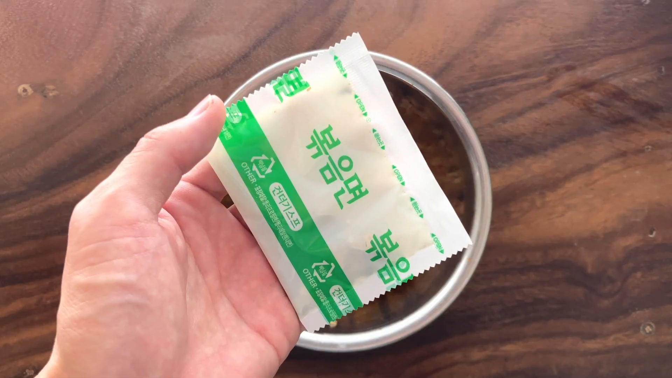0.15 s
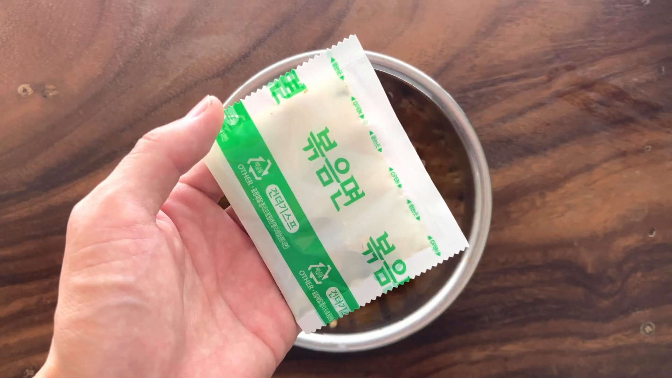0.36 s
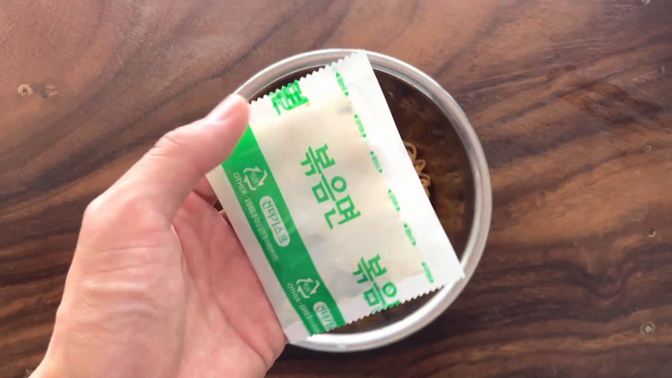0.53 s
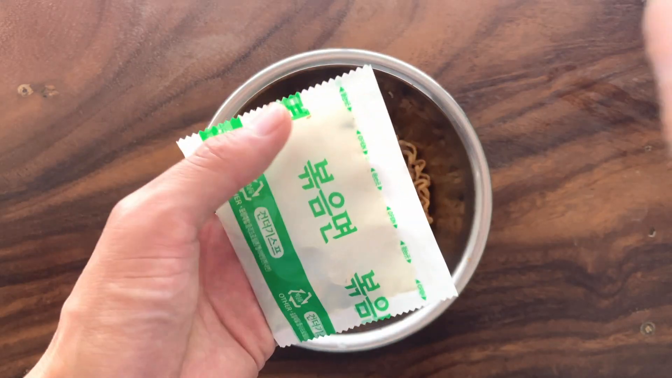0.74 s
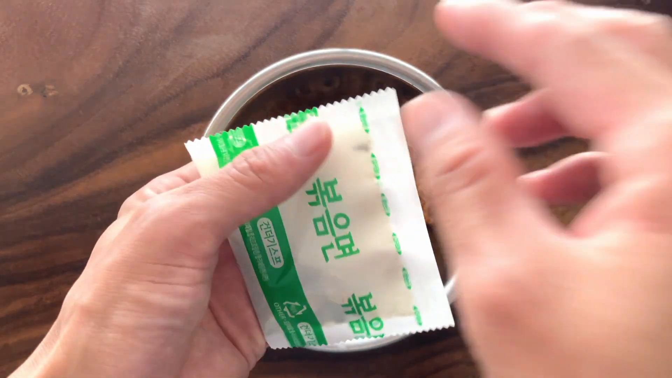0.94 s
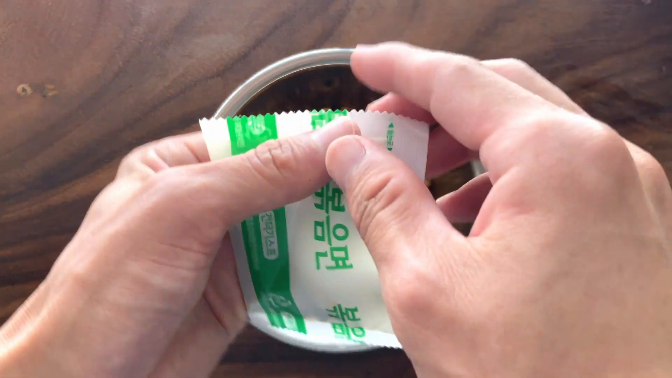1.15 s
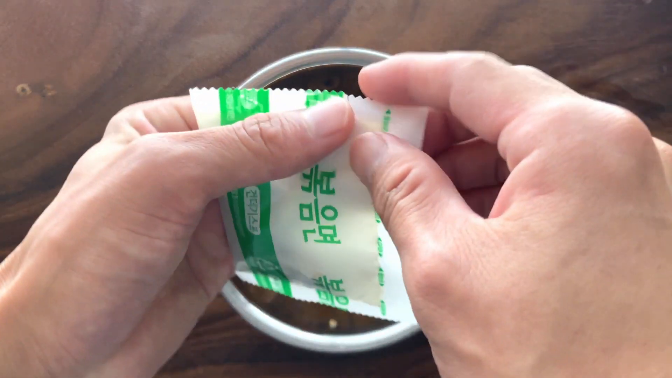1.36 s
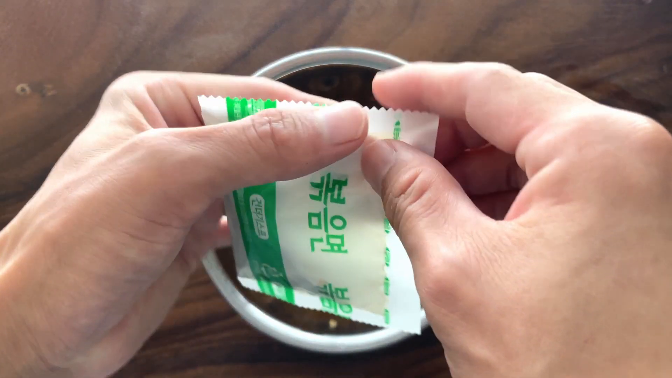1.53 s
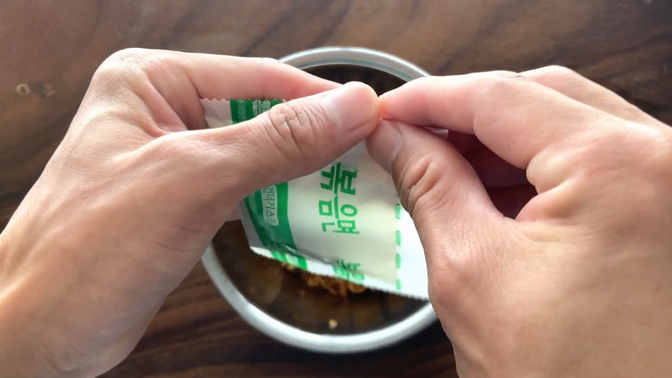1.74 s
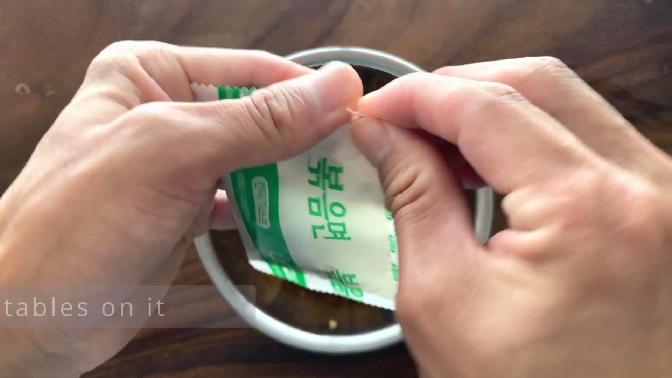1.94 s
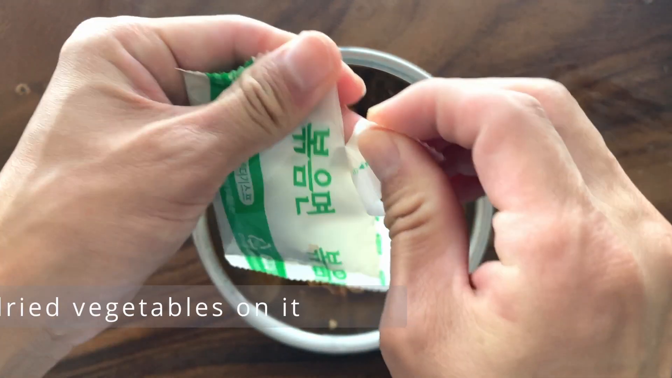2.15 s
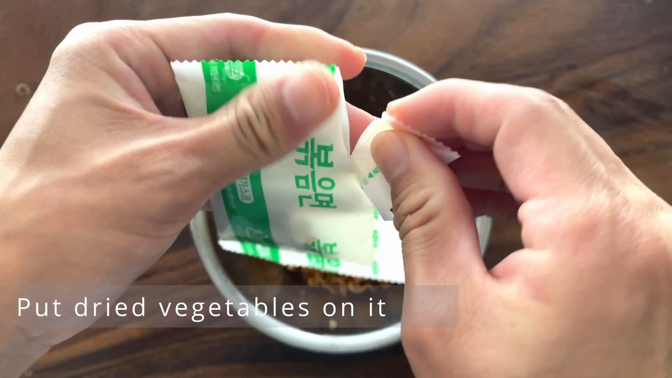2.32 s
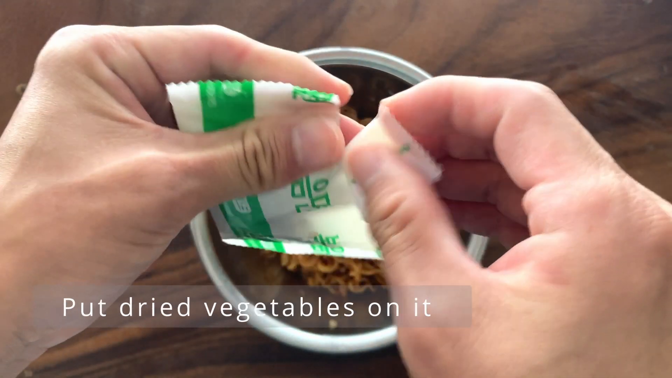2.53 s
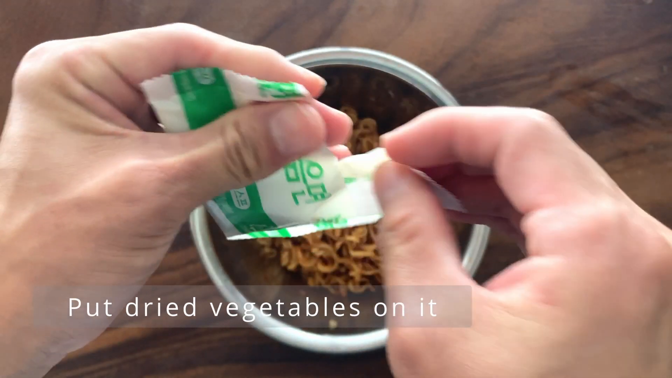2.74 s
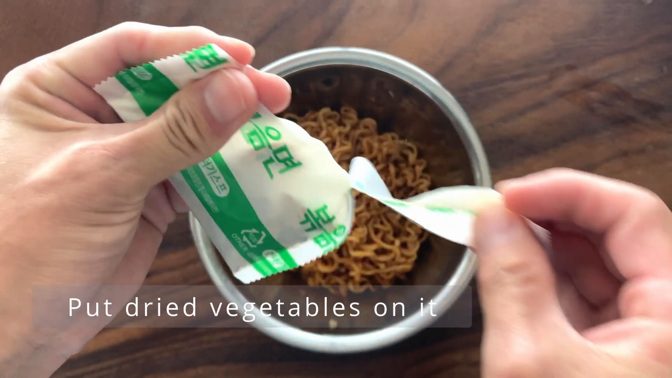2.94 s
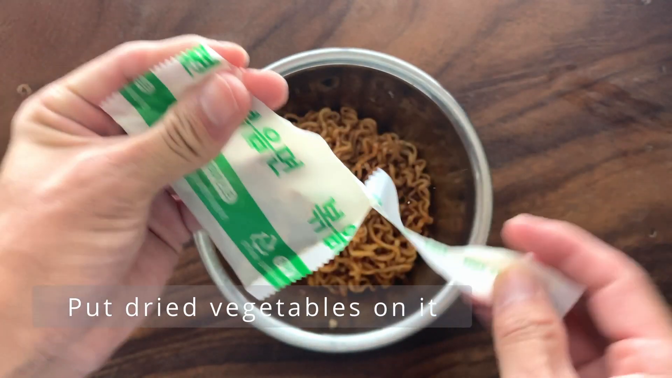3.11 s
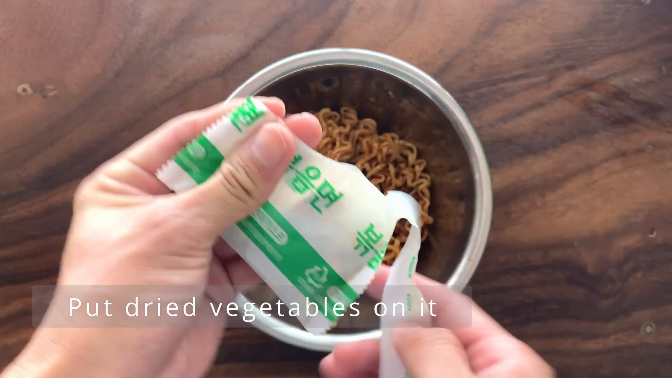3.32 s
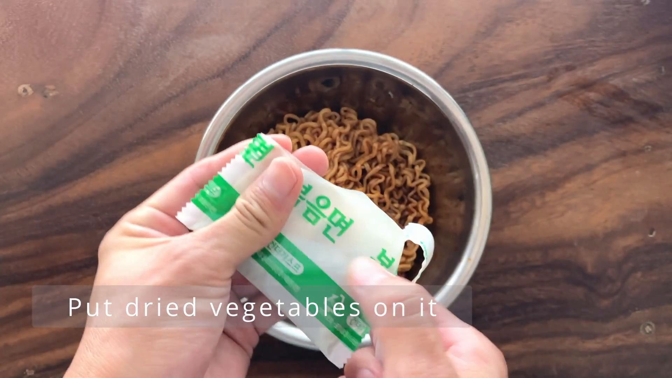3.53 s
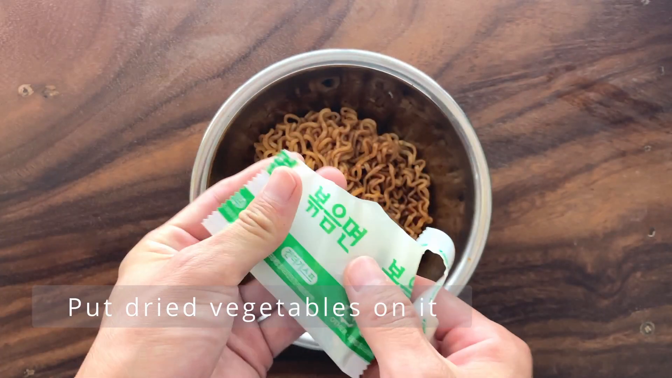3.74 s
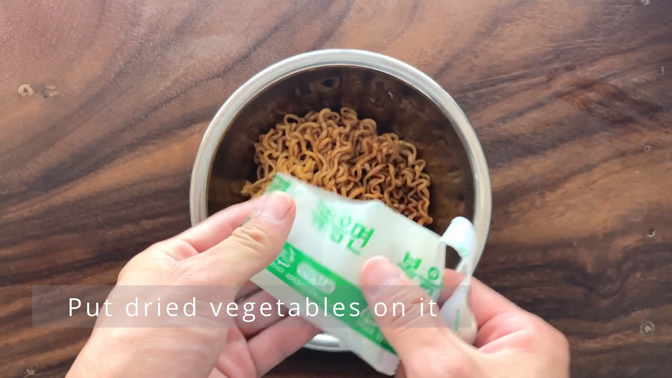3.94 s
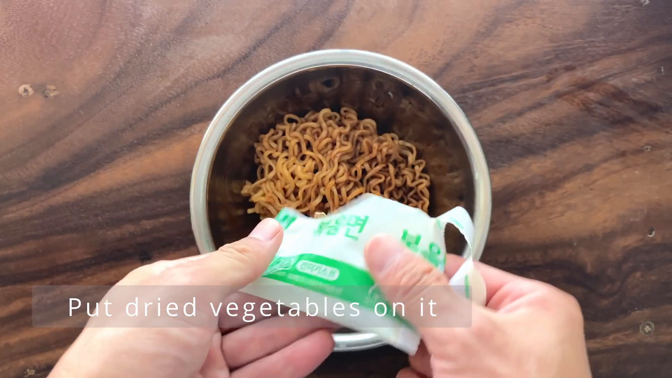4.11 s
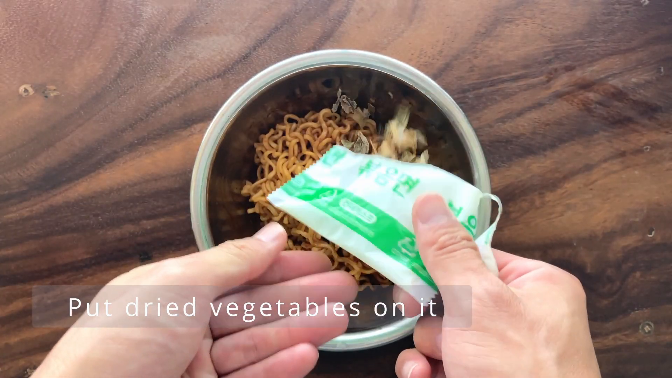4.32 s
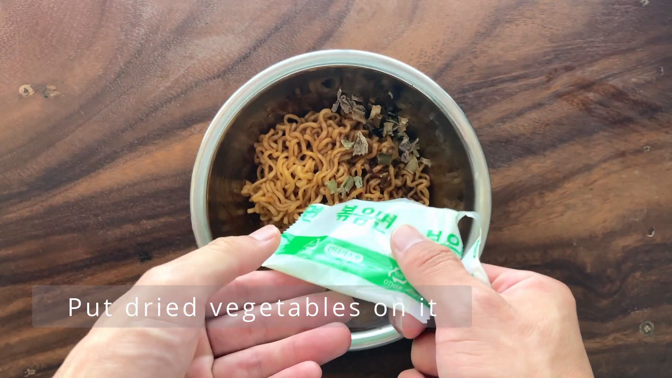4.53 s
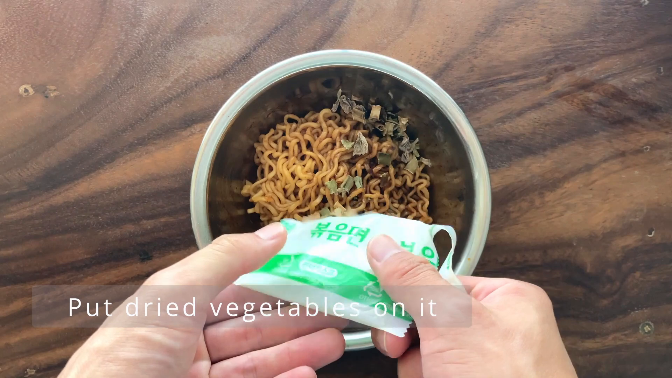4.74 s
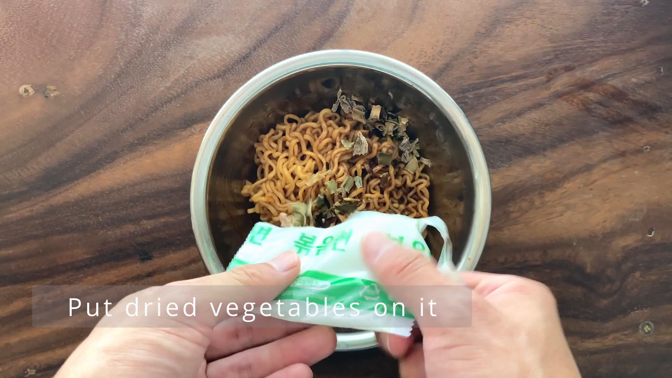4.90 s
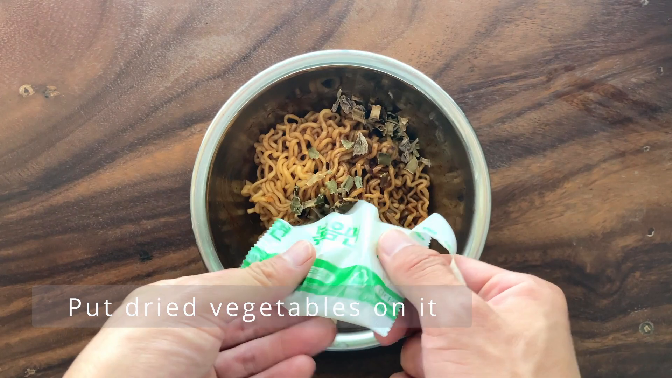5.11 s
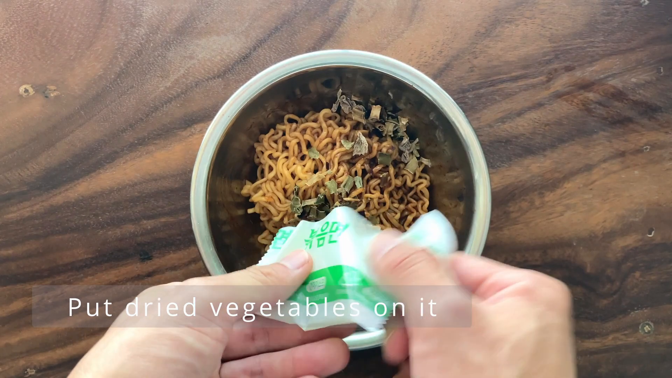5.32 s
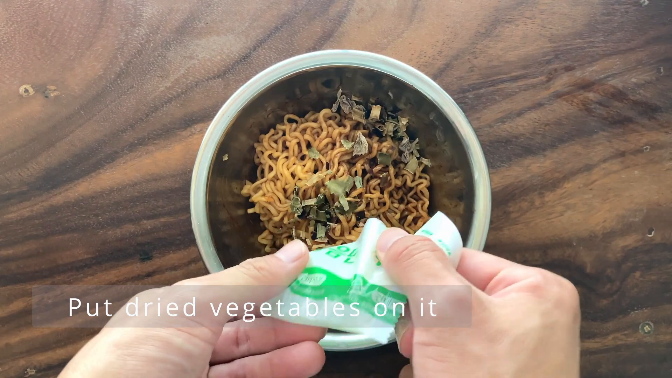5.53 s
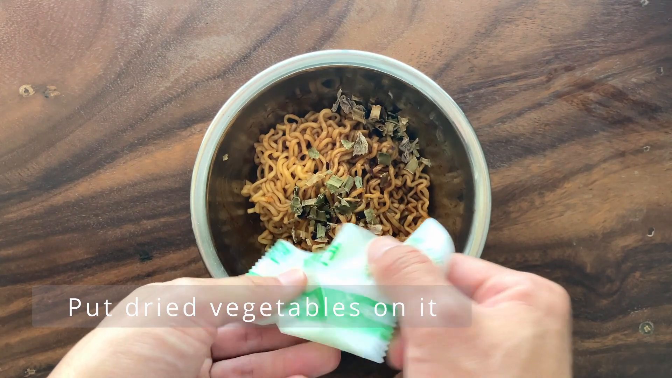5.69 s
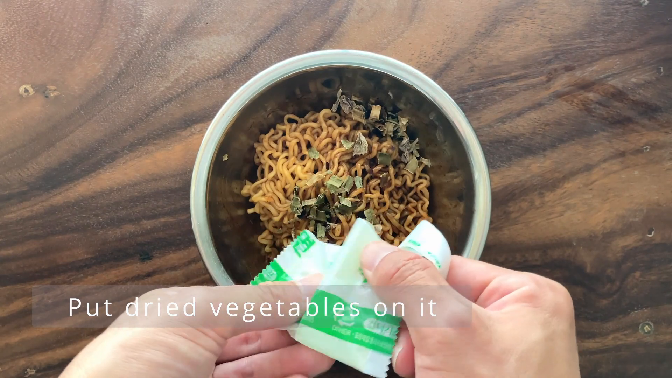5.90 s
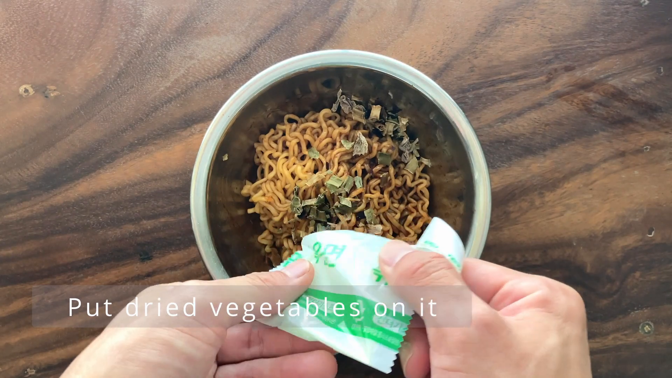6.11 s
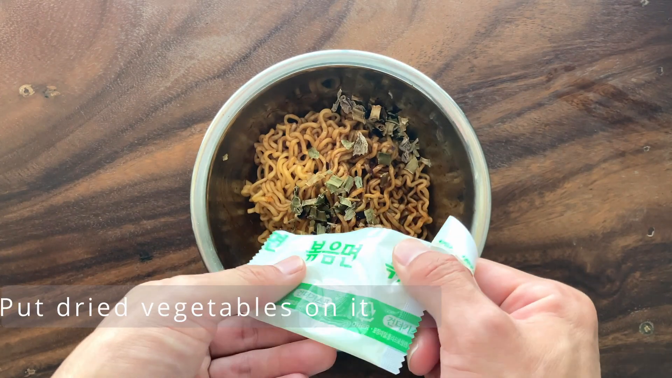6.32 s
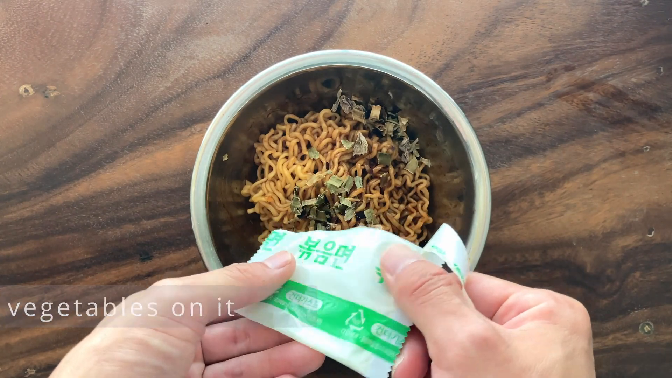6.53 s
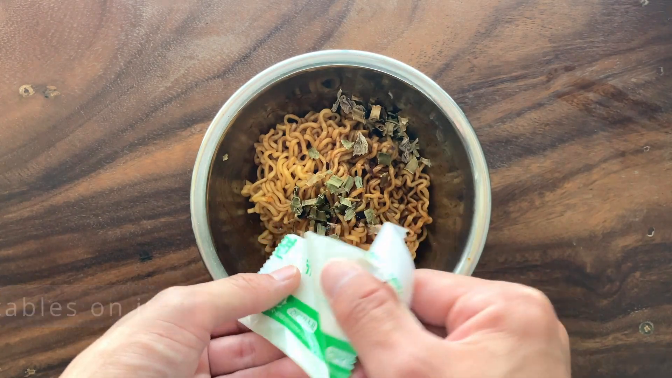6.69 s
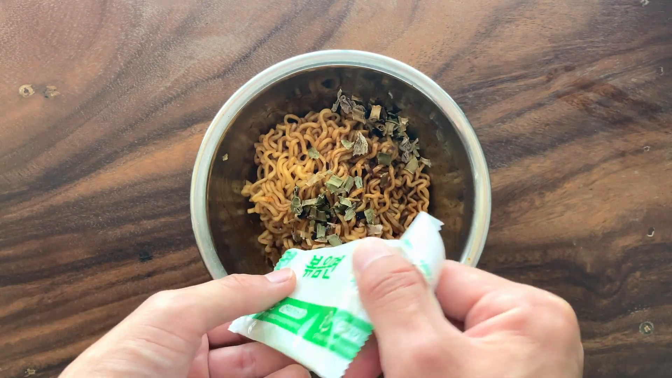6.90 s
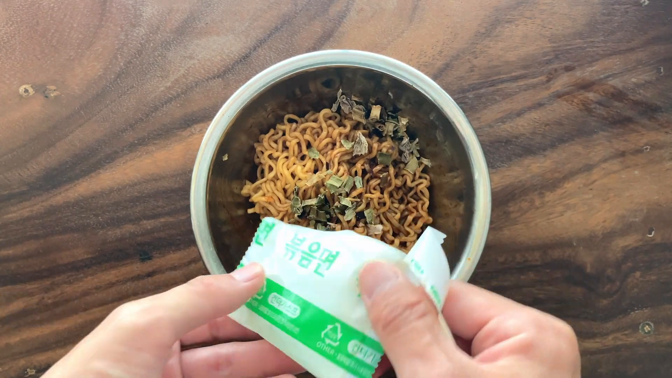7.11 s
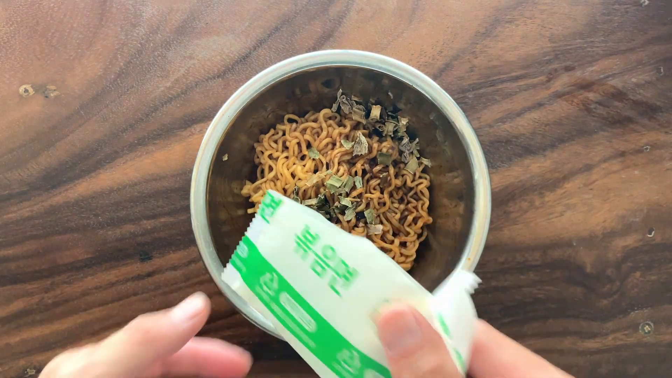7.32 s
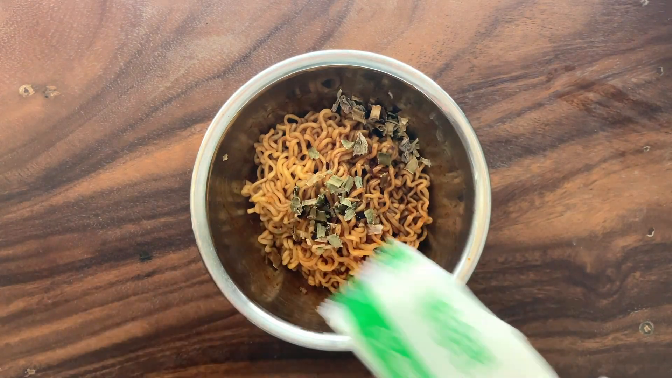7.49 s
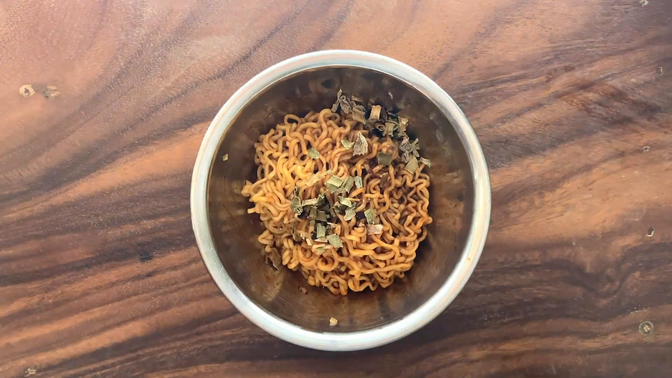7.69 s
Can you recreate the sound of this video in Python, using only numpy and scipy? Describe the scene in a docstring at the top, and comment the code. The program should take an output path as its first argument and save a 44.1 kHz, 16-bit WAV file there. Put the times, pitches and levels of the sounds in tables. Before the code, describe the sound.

Stiff plastic film crinkles close to the microphone, with dry, bright snaps, fine rustling and dull little tugs. The packet is torn open in short bursts, pauses, then drops a few hard bits that tick and ring on a metal bowl. Vigorous crumpling follows, loudest late in the middle, before dying down. Small room with short soft echoes, very faint low hum.

```python
"""Tearing a sachet over a steel bowl

A plastic sachet is gripped, torn open and shaken out over a steel bowl of noodles, close by in a small room.
Each squeeze buckles the film in sharp snaps (filtered pulses) over a fine crackle (random resonant grains).
Tugs add dull noise pushes and short rips; a few hard bits of dried vegetable ring the bowl's resonances.
A faint wavering hum and a low noise rumble with brief swells lie underneath.
"""
import sys
import numpy as np
from scipy import signal
from scipy.fft import rfft, irfft
from scipy.io import wavfile

SR = 44100
rng = np.random.default_rng(int(sys.argv[2]) if len(sys.argv) > 2 else 0)


def log_audio(samples):
    """Write samples as a 16-bit WAV file to the path given in sys.argv[1]."""
    # one column per channel
    frames = np.atleast_2d(samples).T
    # limit to full scale, then quantise
    limited = np.clip(frames, -1, 1)
    pcm = np.round(limited * 32767).astype(np.int16)
    wavfile.write(sys.argv[1], SR, pcm)


N = 341775
T = np.arange(N) / SR
EDGE_HZ = 16200  # upper limit of crease pitches and of the whole sound

# The most distinct snaps of the film, loud ones and faint lone ticks, a few of them perhaps flakes
# hitting the bowl. Each row: time in s, crease level in dB over 3 ms, pitch of the crease in Hz,
# level of the whole sheet flexing in dB over 3 ms before its trim.
DISTINCT_SNAPS = [(0.472, -56.5, 2870, -52), (0.515, -53, 3300, -53), (0.763, -59, 9100, -62),
                  (0.8167, -56, 9100, -62), (0.9613, -51.5, 5350, -59), (1.0019, -39.5, 6660, -40),
                  (1.0582, -49, 6500, -53), (1.1316, -40, 7500, -46), (1.1642, -40, 9050, -58),
                  (1.179, -41, 5500, -43), (1.187, -33.5, 11700, -45), (1.297, -47, 7700, -44),
                  (1.4011, -33, 10700, -36), (1.4325, -40, 10500, -53), (1.449, -39, 8050, -52),
                  (1.4888, -33.5, 8700, -43), (1.501, -38.5, 8500, -41.5), (1.5356, -32, 10700, -41),
                  (1.645, -35, 9450, -41.5), (1.715, -33.5, 9700, -39), (1.7598, -27.5, 9100, -39),
                  (1.771, -30, 6400, -32), (1.8241, -29, 9200, -38.5), (1.847, -27.5, 8100, -56),
                  (1.861, -36, 6950, -38), (1.9268, -43, 3980, -42), (1.972, -43.5, 3020, -51),
                  (2.0288, -32.5, 7940, -30.5), (2.0868, -33.5, 9700, -41.5), (2.098, -41.5, 4830, -35),
                  (2.1455, -33.5, 11700, -50), (2.159, -25.5, 9200, -28), (2.214, -36.5, 11500, -60),
                  (2.269, -30, 8700, -50), (2.28, -26, 8200, -33.5), (2.298, -27, 7850, -39.5),
                  (2.3176, -31, 9400, -33), (2.417, -31, 4830, -41.5), (2.461, -27.5, 7900, -37.5),
                  (2.5333, -38.5, 8900, -70), (2.5483, -60, 4320, -36), (2.625, -40.5, 9800, -60),
                  (2.6929, -37, 2800, -33), (2.734, -19.5, 11800, -42), (2.8056, -31.5, 8600, -35),
                  (2.857, -32.5, 10700, -43), (2.8903, -29, 7900, -36), (2.8936, -23.5, 8100, -57),
                  (2.9305, -26.5, 8950, -33), (2.9573, -27.5, 7040, -30.5), (3.062, -40, 11100, -52),
                  (3.114, -40, 10300, -48), (3.1691, -42.5, 7040, -47), (3.1827, -37, 10200, -45),
                  (3.2185, -44, 6300, -43.5), (3.267, -44, 8300, -68), (3.29, -34, 8260, -45),
                  (3.416, -37.5, 7440, -39.5), (3.4552, -24, 11500, -36), (3.4599, -25, 10300, -55),
                  (3.5367, -30.5, 8200, -63), (3.5507, -29, 9800, -67), (3.6023, -42.5, 5940, -36.5),
                  (3.741, -37, 7660, -38), (3.7662, -26.5, 10200, -57), (3.852, -38, 9100, -43.5),
                  (3.9098, -31.5, 9700, -39), (3.9506, -23, 10300, -70.5), (3.997, -37, 9100, -45.5),
                  (4.163, -29.5, 5840, -34), (4.235, -33, 9200, -41), (4.6002, -65, 4030, -40.5),
                  (4.7081, -56, 3660, -46), (4.794, -42, 10700, -47.5), (4.908, -32.5, 9600, -42),
                  (4.928, -37, 8900, -47.5), (4.9729, -21.5, 8100, -50), (4.9864, -31, 7160, -35),
                  (5.017, -31.5, 8800, -43.5), (5.039, -24, 6400, -51.5), (5.0915, -29.5, 6950, -34),
                  (5.128, -25, 9500, -56.5), (5.1908, -31.5, 8400, -41.5), (5.216, -21, 9200, -33.5),
                  (5.235, -28, 10100, -51), (5.2643, -25, 9200, -53), (5.2834, -29, 10500, -63),
                  (5.3872, -21.5, 6800, -73.5), (5.434, -33.5, 8100, -33.5), (5.5064, -33, 7400, -36.5),
                  (5.5278, -32, 9200, -38.5), (5.5369, -17.5, 11400, -28.5), (5.6253, -32.5, 8500, -29.5),
                  (5.6348, -23.5, 10100, -46), (5.7168, -25, 9350, -46), (5.7288, -29.5, 10700, -58),
                  (5.7824, -22.5, 8550, -41), (5.7897, -23.5, 7150, -31), (5.8744, -26, 7300, -29.5),
                  (5.879, -20.5, 7600, -26), (5.944, -29, 7300, -38), (5.9949, -29, 8400, -32),
                  (6.0835, -27.5, 8250, -30.5), (6.0929, -23, 11000, -53), (6.1363, -27.5, 9500, -48),
                  (6.1482, -23, 9300, -42), (6.242, -26.5, 8850, -39), (6.2728, -32, 8100, -56),
                  (6.2786, -24.5, 8700, -38), (6.3985, -39, 7400, -49), (6.4448, -42, 6700, -36.5),
                  (6.5251, -45, 8160, -40), (6.5466, -32, 7700, -70), (6.565, -37.5, 10800, -56),
                  (6.6261, -37, 11300, -45), (6.679, -30.5, 7000, -34), (6.723, -27, 9300, -64),
                  (6.7576, -26, 10800, -44), (6.8652, -33.5, 6700, -62), (6.9396, -46, 7500, -81),
                  (7.0206, -49.5, 5950, -74), (7.1173, -38, 8000, -76), (7.134, -44, 8500, -60),
                  (7.1944, -45.5, 8700, -66), (7.202, -49, 2680, -60), (7.2856, -57, 3360, -59.5),
                  (7.343, -45.5, 6900, -50.5), (7.5355, -63, 4350, -62.5), (7.6575, -55, 5200, -63)]
# Tone of the film's tiny breaks. Each row: frequency in Hz, relative level in dB per Hz.
CRACKLE_TONE = [(500, -28.5), (1500, -5.5), (3000, 0), (5000, 0), (8000, 0.5), (11000, 2), (14000, -1.5),
                (16500, -25)]


def amp(db):
    """Decibels to gain."""
    return 10 ** (np.asarray(db) / 20)


def unit(x):
    """Scales to rms 1."""
    return x / np.sqrt(np.mean(x ** 2) + 1e-20)


def read(points, hz):
    """Reads a table on a log-frequency axis."""
    f, value = np.transpose(points)
    return np.interp(np.log(hz + 1), np.log(f + 1), value)


def add(mix, s, sound):
    """Mixes a sound in at time s, in seconds."""
    part = mix[max(round(s * SR), 0):][:len(sound)]
    part += sound[:len(part)]


def colour(x, spectrum, size=2048):
    """Filters causally (minimum phase), so that clicks keep their sharp front."""
    log_gain = np.log(amp(read(spectrum, abs(np.fft.fftfreq(size, 1 / SR)))))
    taps = np.fft.ifft(np.exp(np.conj(signal.hilbert(log_gain)))).real
    taps = taps.reshape((1,) * (x.ndim - 1) + (size,))
    return signal.fftconvolve(x, taps, axes=-1)[..., :x.shape[-1]]


def shaped_noise(gain):
    """Steady noise of rms 1 with the given gain at every frequency bin."""
    return unit(irfft(rfft(rng.standard_normal(N)) * gain, N))


def drift(rate_hz):
    """A smooth random wander of rms 1, mostly slower than rate_hz."""
    return shaped_noise(np.exp(-(np.fft.rfftfreq(N, 1 / SR) / rate_hz) ** 2))


def grains(per_s, spread_db):
    """Sparse clicks of uneven size, rms 1."""
    size = amp(spread_db * np.minimum(rng.exponential(1, N), 4))
    sign = rng.choice([-1, 1], N)
    return unit(size * sign * (rng.random(N) < per_s / SR))


def band(x, hz, sharpness):
    """One resonance of gain 1, hz / sharpness wide but never wider than a third of SR."""
    return signal.lfilter(*signal.iirpeak(hz, max(sharpness, 3 * hz / SR), fs=SR), x)


def band_noise(hz, sharpness):
    """Noise of rms 1 narrowed twice by the same resonance."""
    return unit(band(band(rng.standard_normal(N), hz, sharpness), hz, sharpness))


def handling(press_s=.02, relax_s=.04):
    """Gains of crackle and rubbing: squeezes tighten quickly and let go more slowly, on top of the grip."""
    # Each squeeze or shake of the sachet. Each row: start in s, time held in s,
    # fine crackle of the film in dB, rubbing of fingers and sliding flakes in dB, both before their trims.
    squeezes = [(0.441, 0.049, -76, -65.5), (0.745, 0.12, -95, -65), (0.992, .16, -77, -62),
                (1.178, .13, -57.5, -61), (1.4, .11, -58, -58.5), (1.63, .25, -63, -57.5),
                (2.018, .19, -54, -52), (2.258, .06, -51, -64), (2.538, .07, -54, -50.5),
                (2.692, .1, -55, -56), (2.8, .19, -48, -48), (3.118, .2, -62, -59.5),
                (3.408, .15, -54, -58.5), (3.698, .08, -49.5, -50), (3.832, .1, -58.5, -55.5),
                (3.95, .12, -54, -51), (4.137, .3, -49, -53.5), (4.773, .02, -57, -58.5),
                (4.929, .2, -47, -48.5), (5.191, .1, -45.5, -48), (5.402, .2, -49, -49.5),
                (5.608, .19, -40, -47), (5.878, .14, -45, -50), (6.059, .06, -42, -49),
                (6.248, .06, -50, -54), (6.519, .12, -65, -56), (6.668, .1, -52, -54.5),
                (6.851, .09, -63, -91), (7.118, .1, -67, -87), (7.339, 0.018, -68, -70.5)]
    # The steady grip of both hands between squeezes, one row with the same columns.
    grip = (1.26, 6, -67.5, -63.5)
    power = np.zeros((2, N)) + 1e-14
    for start, length, crackle_db, rub_db in squeezes + [grip]:
        press = np.clip((T - start) / press_s + .5, 0, 1)
        relax = np.exp(-np.maximum(T - start - length, 0) / relax_s)
        power += (amp([[crackle_db], [rub_db]]) * press * relax) ** 2
    return np.sqrt(power)


def snaps(rows, ring=0.53, ring_s=0.00053, flutter=0.037, flutter_s=0.0061, sharpness=2.4,
          low_cut_hz=2600, flex_s=0.0029, flex_db=-1.5, panel=0.65, panel_hz=(1500, 3800), size=1200):
    """Each crease flips in one pulse and quivers; the panel of film around it flexes lower and longer."""
    # Tone of the flexing sheet. Each row: frequency in Hz, relative level in dB per Hz.
    flex_tone = [(100, -27.5), (300, -2.5), (600, -6.5), (1100, 2), (1900, 0), (2700, 4.5), (4000, -2.5),
                 (7000, -5)]
    front = round(.003 * SR)  # levels are set over the first 3 ms
    t, out = np.arange(size) / SR, np.zeros(N)
    quiver, sway = rng.standard_normal((2, len(rows), size))
    flips = (t == 0) + quiver * (ring * np.exp(-t / ring_s) + flutter * np.exp(-t / flutter_s))
    flips = signal.lfilter(*signal.butter(2, low_cut_hz, "high", fs=SR), flips)
    sheets = colour(sway * np.exp(-t / flex_s), flex_tone)
    panels = np.exp(rng.uniform(*np.log(panel_hz), len(rows)))  # every panel has its own pitch
    for (s, db, hz, sheet_db), flip, sheet, own_hz in zip(rows, flips, sheets, panels):
        crease = band(flip, hz, sharpness)
        flex = sheet + panel * band(sheet, own_hz, 2)
        add(out, s, amp(db) * crease / crease[:front].std())
        add(out, s, amp(sheet_db + flex_db) * flex / flex[:front].std())
    return out


def neighbours(lag_s=.002, reach_s=0.0031, weaker_db=-16, sheet_db=-12, scatter_db=3, pitch_octaves=0.19):
    """Every listed snap has a weaker neighbour, mostly just after it, sometimes just before; same columns."""
    s, db, hz, flex_db = np.transpose(DISTINCT_SNAPS)
    lag, strength, pitch = rng.standard_normal((3, len(DISTINCT_SNAPS)))
    own_s = s + lag_s + reach_s * lag
    own_db = db + weaker_db + scatter_db * strength
    own_hz = np.minimum(hz * 2 ** (pitch_octaves * pitch), EDGE_HZ)
    return np.transpose([own_s, own_db, own_hz, flex_db + sheet_db])


def small_creases(effort, count=135, firm_db=-39.0, growth=0.42, scatter_db=3,
                  pitch_hz=8800, pitch_octaves=0.48, sheet_db=-9, sheet_scatter_db=5):
    """Further snaps at random, more and louder in a harder squeeze; rows like DISTINCT_SNAPS."""
    yield_db = -67  # under a lighter effort than this no small creases buckle
    firm_effort_db = -47  # effort of a firm squeeze, whose snaps centre on firm_db
    effort_db = 20 * np.log10(effort)
    share = np.cumsum(np.maximum(effort_db - yield_db, 0))
    turn = (np.arange(count) + rng.random(count)) / count
    at = np.searchsorted(share / share[-1], turn)
    strength, pitch, flex = rng.standard_normal((3, count))
    db = firm_db + growth * (effort_db[at] - firm_effort_db) + scatter_db * strength
    hz = np.minimum(pitch_hz * 2 ** (pitch_octaves * pitch), EDGE_HZ)
    return np.transpose([at / SR, db, hz, db + sheet_db + sheet_scatter_db * flex])


def wrinkles(count=16, size=400, per_s=22, spread_db=4.5, length_s=0.0013):
    """Families of tiny wrinkles, each with its own pitch and length."""
    t, out = np.arange(size) / SR, np.zeros(N)
    for hz in np.geomspace(1200, 14000, count):
        u = t / (length_s * rng.uniform(0.3, 1))
        grain = band(rng.standard_normal(size) * u * np.exp(-u), hz, 7.0)
        family = signal.oaconvolve(grains(per_s, spread_db), grain)[:N]
        out += np.sqrt(hz) * unit(family)
    return out


def rustle(effort, rubbing, crackle_db=1, slide_db=-8, rub_db=-2, clump_db=3, rub_clump_db=3):
    """Tiny wrinkles give way in clumps while skin and flakes slide along the film."""
    # Tone of the rubbing. Each row: frequency in Hz, relative level in dB per Hz.
    rub_tone = [(100, -4.5), (250, -6), (450, 7.5), (750, 0.5), (1100, 3), (1900, 2.5), (2800, -3.5),
                (4000, -9), (8000, -8.5)]
    clumps = drift(rate_hz=21.0)
    crackle = amp(crackle_db + clump_db * clumps) * unit(colour(wrinkles(), CRACKLE_TONE))
    slide = amp(slide_db) * unit(colour(rng.standard_normal(N), CRACKLE_TONE))
    pressure = (clumps + drift(rate_hz=23)) / np.sqrt(2)  # partly follows the crackle
    scrape = unit(colour(grains(per_s=1200, spread_db=2.5), rub_tone))
    rub = amp(rub_db + rub_clump_db * pressure) * scrape
    return (crackle + slide) * effort + rub * rubbing


def rip(length, per_s=5000, spread_db=2, stop_s=.0015, size=3000):
    """A quick run of tiny breaks along the film, about rms 1 while it lasts."""
    t = np.arange(size) / SR
    strength = rng.choice([-1, 1], size) * amp(spread_db * rng.standard_normal(size))
    breaks = strength * (rng.random(size) < per_s / SR)
    run = colour(breaks * np.exp(-np.maximum(t - length, 0) / stop_s), CRACKLE_TONE)
    return unit(run) * np.sqrt(length * SR / size)


def tugs(fade_s=0.016, level_db=-3, rip_db=-1, size=3000):
    """The pouch is jerked taut and pushes a little air while the film gives way in a short rip."""
    # Each row: time in s, peak of the push in dB, rip length in s, rip level in dB, both before their trims.
    pulls = [(1.199, -28.5, .009, -29.5), (1.455, -55, 0.014, -41), (2.27, -35, .011, -36),
             (2.31, -36.5, .011, -34.5), (2.818, -32.5, .006, -33.5), (2.928, -36, .007, -27),
             (2.959, -50, .012, -34), (5.223, -39.5, .006, -53), (5.539, -32, .01, -35),
             (5.633, -37.5, .035, -37.5), (5.748, -50.5, .03, -34.5), (6.071, -37, .008, -27.5)]
    # Tone of the dull push. Each row: frequency in Hz, relative level in dB per Hz.
    pouch_tone = [(60, -19), (180, -12.5), (300, -4.5), (500, -4.5), (750, -12), (1500, -9.5),
                  (4000, -40.5)]
    t, out = np.arange(size) / SR, np.zeros(N)
    pushes = colour(rng.standard_normal((len(pulls), size)) * np.exp(-t / fade_s), pouch_tone)
    for (s, db, length, give_db), push in zip(pulls, pushes):
        add(out, s, amp(db + level_db) * push / abs(push).max())
        add(out, s, amp(give_db + rip_db) * rip(length))
    return out


def hands(rubbing, level_db=-62, hz=160, sharpness=1.37, follow=0.23):
    """The moving hands and pouch add a soft low rumble that grows a little with the rubbing."""
    return amp(level_db) * band_noise(hz, sharpness) * unit(rubbing ** follow)


def bowl(shimmer_db=-3, shimmer_s=0.01, linger_db=-22, linger_s=0.075, modes_db=-3,
         tick_db=-10, tick_s=0.0044, twin=0.18, split=.0012, click_db=8):
    """Hard bits ping the steel: click and tick, slow wall modes below shell_hz, dense short shimmer above."""
    # Dried bits landing. Each row: time in s, strength in dB, how much the wall is set swinging in dB.
    bits = [(4.3148, -15.5, -16), (4.3224, -8, -27.5), (4.3830, -12, -2.5), (4.4140, -25, 1),
            (4.4173, -29.5, 1.5), (4.4323, -18.5, -2)]
    # Modes of the bowl. Each row: frequency in Hz, level in dB before its trim, 60 dB decay time in s.
    steel_modes = [(1265, -36.5, 1.2), (1950, -48, 1.6), (2555, -35, .75), (3380, -35.5, 1.2),
                   (5410, -35, .3), (6325, -28.5, .35), (7138, -38, .35), (8600, -34, .3), (8745, -36, .45),
                   (9145, -19, .15), (9455, -26, .25), (9795, -15, .18), (10150, -23, .17),
                   (10655, -27, .2), (11294, -25, .17), (12190, -25, .2), (13387, -31, .18)]
    shell_hz = 9000
    t, out = np.arange(SR) / SR, np.zeros(N)
    hz, db, t60 = np.transpose(steel_modes)[:, :, None]
    wall = hz < shell_hz
    # the bowl is not quite round, so every wall mode beats against a twin
    twins = twin * wall * np.sin(2 * np.pi * hz * (1 + split) * t)
    swings = np.sin(2 * np.pi * hz * t) - twins
    above = signal.butter(12, shell_hz, "high", fs=SR, output="sos")
    click = amp(click_db) * signal.sosfilt(above, 1. * (t == 0))
    fade = amp(shimmer_db) * np.exp(-t / shimmer_s) + amp(linger_db) * np.exp(-t / linger_s)
    for s, strength_db, wall_db in bits:
        modes = amp(modes_db) * (amp(db + wall_db * wall - 60 * t / t60) * swings).sum(0)
        shimmer = band(signal.sosfilt(above, rng.standard_normal(SR) * fade), 9900, 3.2)
        contact = band(rng.standard_normal(SR) * np.exp(-t / tick_s), 3100, 0.89)
        tick = amp(tick_db + wall_db) * contact
        add(out, s, amp(strength_db) * (modes + shimmer + tick + click))
    return out


def room(x, tail_db=-14, table_db=-18, dull_hz=9500, size=22050):
    """Quick echoes off the table and hands, then a soft dull tail that dies sooner in the treble."""
    # Each row: frequency in Hz, 60 dB decay time in s.
    decay_times = [(200, 0.54), (1000, 0.72), (4000, 0.45), (9000, 0.22), (16000, 0.22)]
    hz, t, z = signal.stft(rng.standard_normal(size), SR, nperseg=256)
    z *= amp(-60 * t / read(decay_times, hz)[:, None])
    z /= np.hypot(1, (hz[:, None] / dull_hz) ** 2.5)
    tail = signal.istft(z, SR, nperseg=256)[1]
    tail *= 1 - np.exp(-np.arange(len(tail)) / SR / 0.0005)  # soft onset
    tail *= amp(tail_db) / np.linalg.norm(tail)
    for delay_s, echo_db in [(.0013, -32), (.0033, -1), (.0062, -13.5), (.013, -6)]:
        tail[round(delay_s * SR)] += amp(table_db + echo_db)
    return x + signal.fftconvolve(x, tail)[:N]


def background(air_db=-61.5, waver_db=2, wander_cycles=0.065):
    """Low noise rumble of the room and an appliance hum whose partials waver in level and phase."""
    # Tone of the rumble. Each row: frequency in Hz, relative level in dB per Hz.
    air_tone = [(20, -16.5), (35, -12), (48, -16), (62, -7), (85, -5.5), (125, -4.5), (200, -17.5),
                (350, -19), (600, -23), (1200, -27), (2500, -39), (6000, -47), (16000, -50.5)]
    # Partials of the hum. Each row: frequency in Hz, level in dB around which it wavers.
    hum_partials = [(62, -66), (123, -72), (293.5, -67)]
    out = amp(air_db) * shaped_noise(amp(read(air_tone, np.fft.rfftfreq(N, 1 / SR))))
    for hz, db in hum_partials:
        cycles = hz * T + wander_cycles * drift(rate_hz=5.7)
        out += amp(db + waver_db * drift(rate_hz=8.4)) * unit(np.sin(2 * np.pi * cycles))
    return out


def swells(sharpness=3):
    """The rumble rises briefly now and then: narrow noise under a bell-shaped envelope."""
    # Each row: centre in s, half length in s, pitch in Hz, level at the centre in dB.
    rises = [(.15, 0.1, 61.7, -62.5), (2.616, 0.074, 66, -54), (6.123, 0.16, 143, -55.5),
             (6.55, 0.14, 65.3, -56.5), (7.148, 0.055, 113, -59)]
    out = np.zeros(N)
    for s, half_s, hz, db in rises:
        bell = np.exp(-((T - s) / half_s) ** 2 / 2)
        out += amp(db) * bell * band_noise(hz, sharpness)
    return out


def scene():
    """Sachet and bowl sound in the room; the low rumbles and hum are added without its echoes."""
    effort, rubbing = handling()
    creases = np.vstack([DISTINCT_SNAPS, neighbours(), small_creases(effort)])
    sachet = snaps(creases) + tugs() + rustle(effort, rubbing)
    return (room(sachet + bowl()) + hands(rubbing) + background() + swells())[None]


def record(dry):
    """The band limit of the recorder: a steep low-pass."""
    taps = signal.firwin(161, EDGE_HZ, window=("kaiser", 8), fs=SR)
    return signal.oaconvolve(dry, taps[None], "same")


dry = scene()
out = record(dry)
log_audio(out)
```